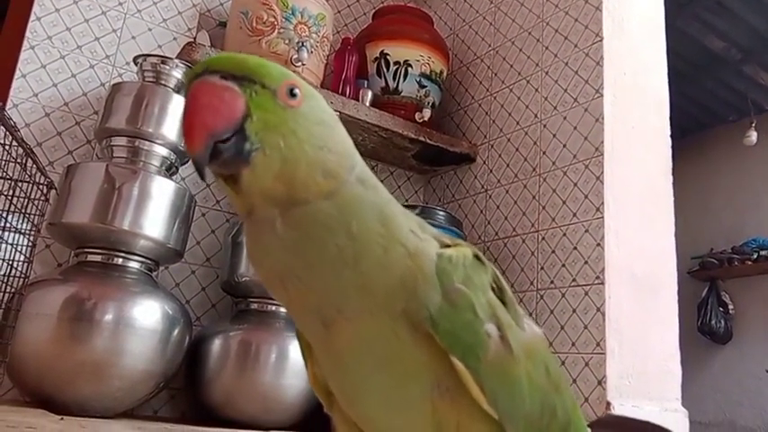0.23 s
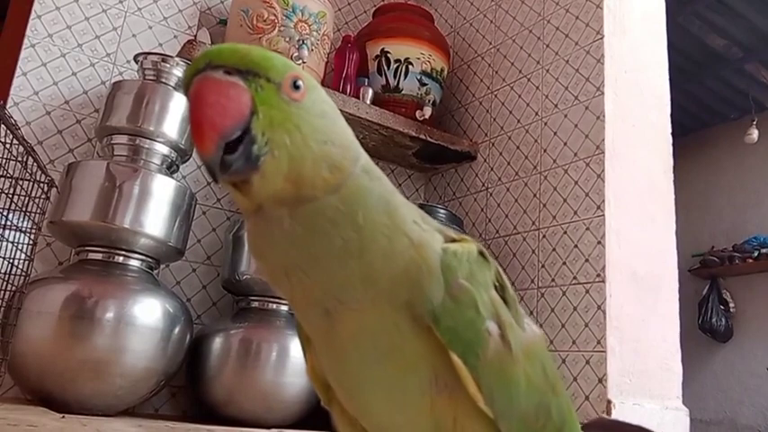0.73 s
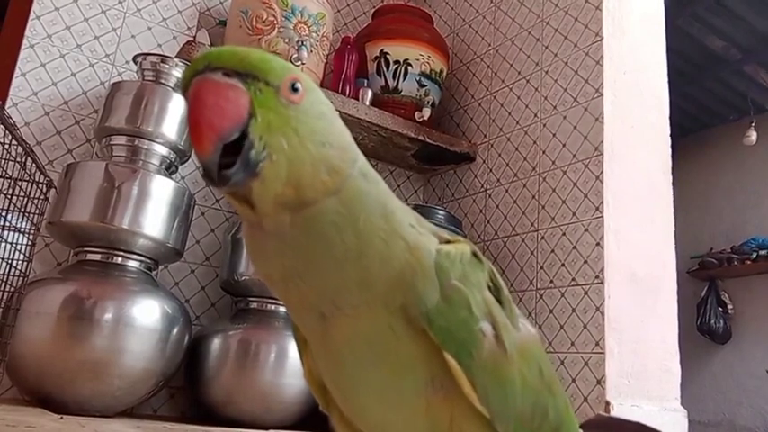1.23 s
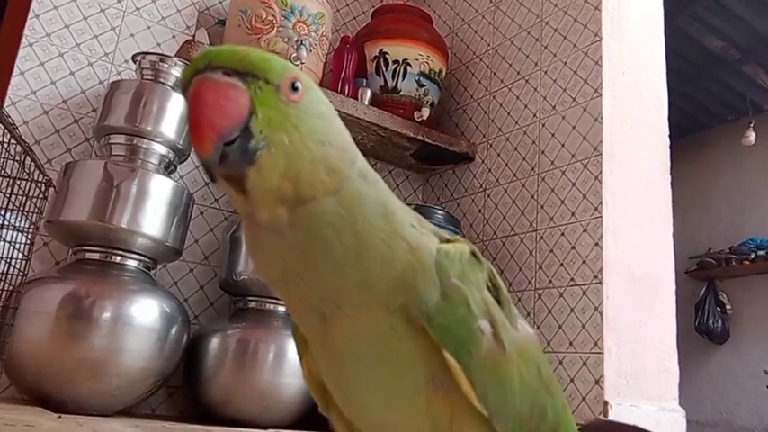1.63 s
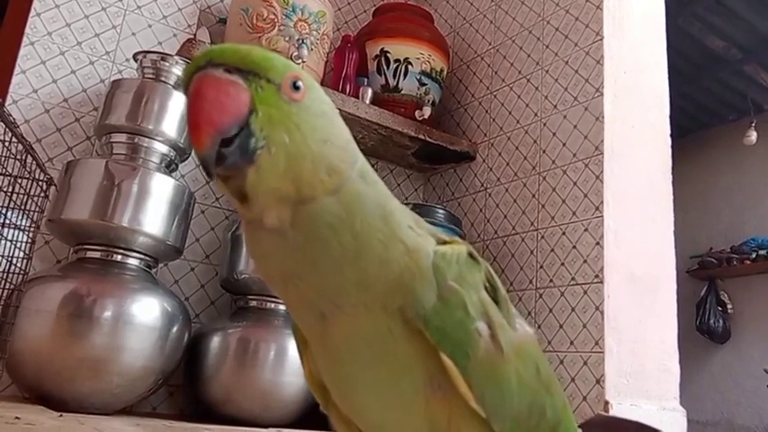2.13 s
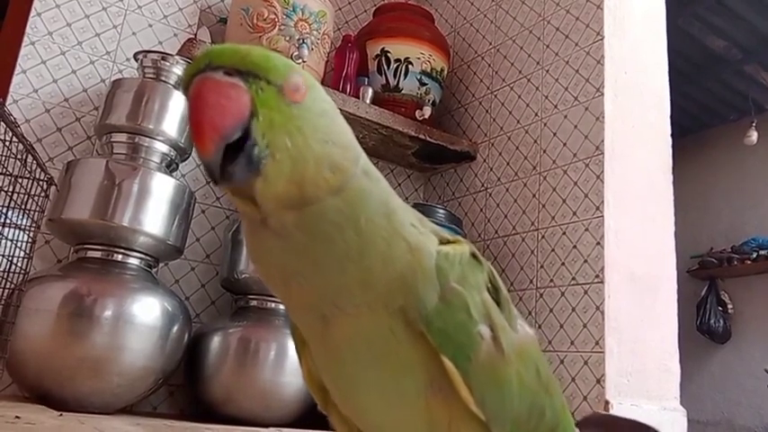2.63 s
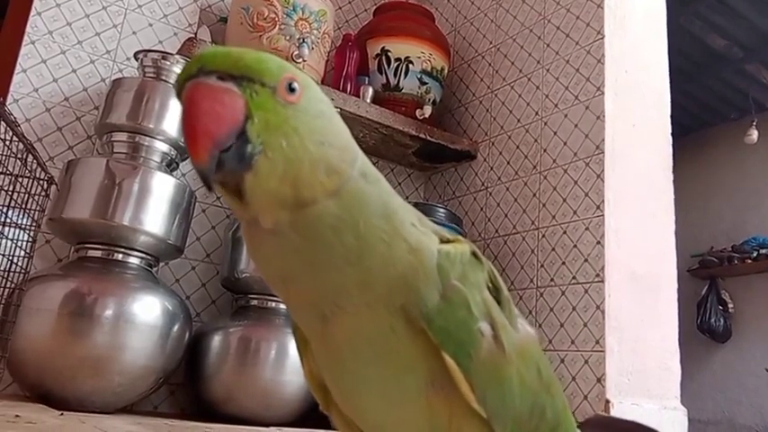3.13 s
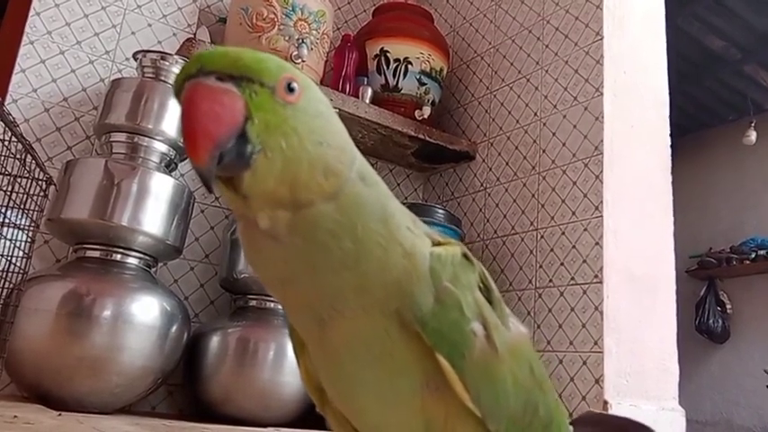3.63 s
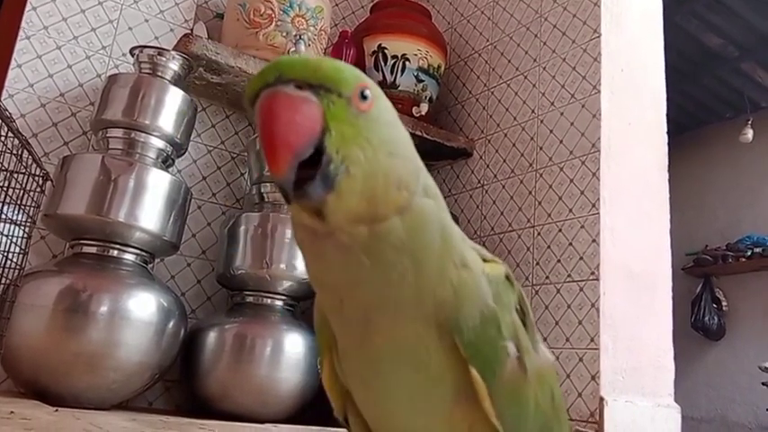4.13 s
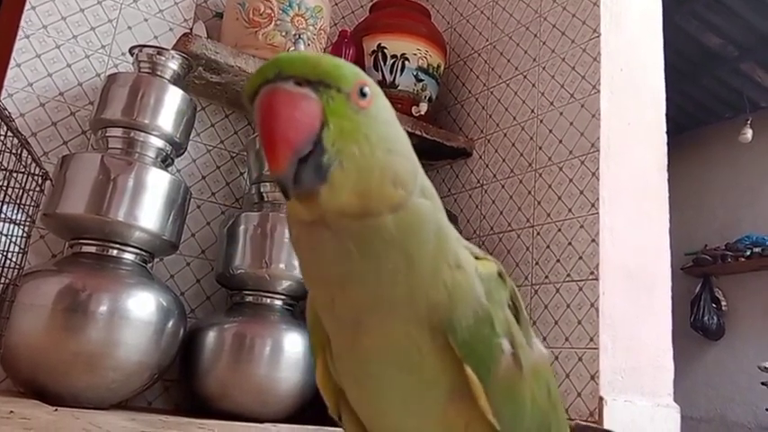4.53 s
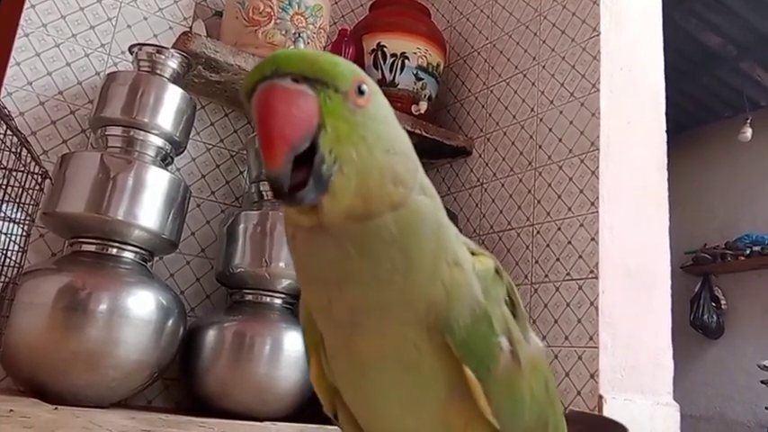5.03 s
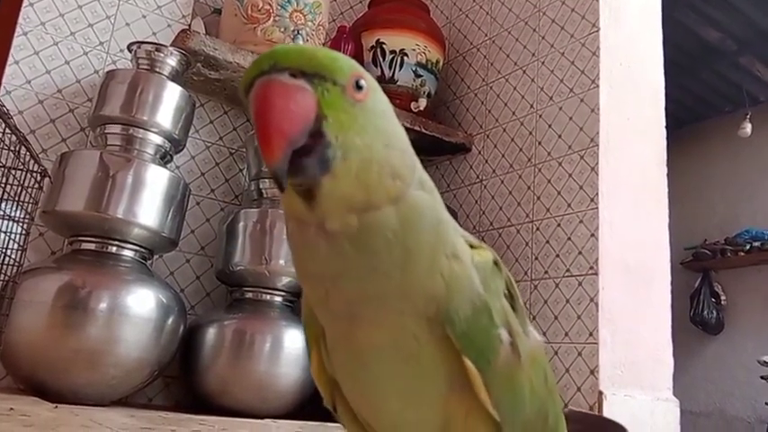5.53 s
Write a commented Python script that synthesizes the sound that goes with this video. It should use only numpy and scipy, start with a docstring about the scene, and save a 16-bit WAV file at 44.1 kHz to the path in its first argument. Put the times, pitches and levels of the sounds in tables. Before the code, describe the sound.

A parakeet chatters close to the microphone in a small tiled kitchen, each call ringing briefly off the hard walls. Two soft whistles sweep upward in the first half second. A yap comes at 0.7 seconds, then two high yelps that tumble down at 0.8 and 1.0. A fast, falling trill runs from 1.4 to 1.75, followed by a falling squeak at 1.9 and a rising one from 2.2 to 2.5. A cluck with a beak click lands at 2.8, and a rising whistle at 3.0. A nasal buzz, clucks and a drawn-out nasal note fill 3.3 to 3.8. After a faint beak tick, a croak and a short rattle come around 4.2 to 4.4. A whistle climbs to a loud peak near 4.8, followed by another upsweep, a raspy screech at 5.2, a dropping squeak at 5.5 and a final rising whistle. A faint low rumble comes and goes underneath.

```python
"""A parakeet chatters up close in a small tiled kitchen: soft whistles, squawks, yelps, one trill,
swooping squeaks, nasal buzzes, clucks and a short rattle, with two ticks of the beak.
Every call is one voice: the syrinx makes a stack of gliding harmonics, coloured by the windpipe,
the throat and the opening of the beak. The hard walls ring on after each call,
and a faint low rumble comes and goes over still room air."""
import sys
import numpy as np
from scipy import signal
from scipy.fft import rfft, irfft
from scipy.io import wavfile
from scipy.ndimage import uniform_filter1d

SR = 44100
rng = np.random.default_rng(int(sys.argv[2]) if len(sys.argv) > 2 else 0)


def log_audio(samples):
    """Write samples as a 16-bit WAV file to the path given in sys.argv[1]."""
    # one column per channel
    frames = np.atleast_2d(samples).T
    # limit to full scale, then quantise
    limited = np.clip(frames, -1, 1)
    pcm = np.round(limited * 32767).astype(np.int16)
    wavfile.write(sys.argv[1], SR, pcm)


N = 254898

CUTOFF_HZ, LOWEST_VOICE_HZ = 15900, 440
WINDPIPE_HZ, WINDPIPE_Q = 3293, 4.95
BEAK_SHUT_HZ, BEAK_WHISTLE_MAX_HZ, BEAK_Q = 1157, 3020, 2.85
SMEAR_S = 0.00072   # the top of the spectrum leaves the throat this much later than the bottom
# depth of the fast pitch wobble: on a steady note, and added in a fast glide
STEADY_WOBBLE, GLIDE_WOBBLE, FAST_GLIDE_OCT_PER_S = .0035, 0.079, 50
TRILL_START_S, TRILL_LENGTH_S = 1.396, .356

# throat colour when whistling, narrowed to a buzz, wide open and trilling: f/Hz, relative level/dB
WHISTLE_THROAT = [(600, 25), (1200, 20.5), (1900, 2), (2800, -9.5), (3400, 3), (4100, -21.5), (5000, 0.5),
                  (6000, 3.5), (7000, 4.5), (8200, -9.5), (10000, 20), (11500, 20), (13300, 2.5),
                  (15500, -3)]
BUZZ_THROAT = [(400, 13.5), (600, 0), (1000, 0), (1600, 0), (2400, 1), (3400, -1.5), (4600, 3.5),
               (5700, -5.5), (6900, 3), (7900, -6), (9800, 12.5), (11400, 22), (13300, -2.5), (15500, 13)]
OPEN_THROAT = [(400, 12), (600, 0.5), (1000, 0.5), (1600, 0), (2400, 4), (3400, 0.5), (4600, 5.5),
               (6000, 1.5), (7000, 7), (8200, 6.5), (10000, 18.5), (11500, 20.5), (13300, -10.5),
               (15500, 13)]
TRILL_THROAT = [(600, 3.5), (1000, -2), (1600, 1), (2400, -1), (3300, -4), (4300, -3), (5200, 1),
                (7000, 0.5), (8200, 2), (10000, 12), (11500, 20.5), (13300, 8), (15500, 20.5)]
# narrow dips in the top of every call, and the nasal colour of buzzes and clucks: f/Hz, Q, gain/dB
TREBLE_NOTCHES = [(12380, 6.7, -12), (8200, 17, -7.5)]
NASAL_PEAKS = [(3466, 12, 5), (4860, 11.5, 3.5), (5490, 9.9, -5.5), (8000, 4.5, -5), (11350, 15, 8)]
# spells of hoarseness: t/s, length/s, added wobble
RASPS = [(1.386, 0.24, 0.011), (3.445, 0.048, 0.073), (4.214, 0.021, 0.12), (5.187, 0.085, 0.17),
         (5.27, .07, 0.015), (5.326, 0.049, 0.1), (5.481, 0.063, 0.054)]

# a whistle's strength and purity follow its pitch: f/Hz, upsweep gain/dB, overtone slope/(dB/oct)
WHISTLE_RESPONSE = [(1160, 0, 5), (1307, -3, 7), (1670, -9.5, 8.5), (1835, -4, 8.5), (2117, 1, 5.5),
                    (2760, -4.5, -6.5)]
# soft whistles, levels before that gain: t/s, length/s, attack/s, scoop/Hz, held f/Hz, creep/(Hz/s),
# mid-sweep t/s, sweep time/s, top f/Hz, held level/dB, sweep level/dB
UPSWEEPS = [(0, .09, 0.00033, 2, 1340, 3, 0.054, 0.016, 2572, -32.5, -28.5),
            (0.235, 0.21, 0.06, 20, 1571, -5, 0.42, 0.011, 2976, -33.5, -28),
            (2.983, 0.22, 0.016, 177, 1145, 1054, 3.187, 0.011, 2864, -30, -32),
            (4.822, .148, 0.00044, 716, 1797, 4, 4.946, 0.014, 3340, -41, -26.5),
            (5.622, 0.16, 0.0089, 140, 1253, 306, 5.82, 0.022, 2770, -33.5, -31)]
# one long whistle climbing to a peak: t/s, f/Hz, level/dB
ARCHED_WHISTLE = [(4.518, 610, -44.5), (4.538, 584, -42), (4.578, 802, -40), (4.6, 1252, -33),
                  (4.624, 1492, -44), (4.674, 2220, -36.5), (4.71, 2940, -28), (4.744, 3340, -18.5),
                  (4.776, 3505, -17.5), (4.798, 3424, -20.5), (4.82, 2450, -34)]
# faint rough squeaks trailing two of the whistles: t/s, length/s, start f/Hz, end f/Hz, peak level/dB
TRAILS = [(0.092, 0.17, 3740, 2785, -48.5), (3.202, 0.16, 3850, 2610, -50)]

# gestures of the longer calls: t/s, f/Hz, level/dB, overtone slope/(dB/oct)
YAP = [(0.652, 478, -40.5, -2), (0.664, 589.5, -27, -2), (0.692, 1413, -22.5, -2), (0.698, 1169, -26.5, -2),
       (0.706, 819, -25, -2), (0.72, 617, -26, -2), (0.735, 602, -42, -2)]
FALLING_SQUEAK = [(1.877, 2015, -27.5, -2), (1.897, 1973, -21.5, -4), (1.919, 1622, -27, -0.5),
                  (1.931, 1777, -27.5, -0.5), (1.943, 1615, -21, -2), (1.999, 1511, -25.5, -5),
                  (2.023, 1167, -24, -5), (2.057, 1136, -26, -6), (2.076, 1110, -37, -2.5)]
RISING_SQUEAK = [(2.21, 496, -56, -1.5), (2.232, 767, -45, -8.5), (2.256, 748, -35, -5),
                 (2.288, 732.6, -33, -5), (2.35, 810, -27, -2.5), (2.376, 1220, -30, -3.5),
                 (2.402, 1376, -25.5, -4.5), (2.452, 1471, -24.5, -6.5), (2.5, 1482, -23, -5.5),
                 (2.522, 1348, -26.5, -3), (2.542, 1203, -28.5, -4)]
BUZZ = [(3.32, 523, -48.5, -1), (3.348, 482.6, -34.5, -0.34), (3.406, 494.7, -28, -0.37),
        (3.416, 512, -27.5, -1), (3.423, 526, -43, -1)]
DRAWL = [(3.478, 587, -30, 0.0035), (3.484, 597, -31.5, 0), (3.494, 540, -30.5, 0.0063),
         (3.546, 509, -42, 0.0026), (3.674, 619, -35, 0.0044), (3.776, 660.4, -34, 0), (3.8, 643, -34.5, 0),
         (3.822, 555, -35, 0), (3.834, 436, -46, 0.0038), (3.842, 430, -42, 0)]
CROAK = [(4.192, 530, -33, 1), (4.198, 505, -30, 1), (4.216, 504.5, -28, 1), (4.226, 513, -36, 1),
         (4.239, 503, -42, 1)]
SCREECH = [(5.172, 463, -36.5, -1.5), (5.19, 710, -27.5, -2.2), (5.202, 762, -28, -1.1),
           (5.238, 797.5, -25.5, -1.2), (5.266, 644, -25.5, -0.025), (5.314, 612, -29, -0.53),
           (5.338, 854.0, -24, -1.1), (5.352, 743, -25.5, -2.7), (5.376, 708.7, -40, -1.5)]
SHORT_SQUEAK = [(5.467, 2945, -33.5, -7), (5.485, 2806, -24.5, -1), (5.495, 2015, -31, -3),
                (5.503, 1292, -25.5, -8), (5.511, 1024, -28, -5), (5.521, 1162, -50, -9)]
# how the beak plays them: gesture, wide-open resonance f/Hz, closing/(oct/dB below the peak)
SQUAWK_CALLS = [(YAP, 4000, .005), (SCREECH, 3730, 0.011)]
SQUEAK_CALLS = [(FALLING_SQUEAK, 4130, 0.049), (RISING_SQUEAK, 4840, 0.11), (SHORT_SQUEAK, 4340, .02)]
NASAL_CALLS = [(BUZZ, 3380, 0.13), (DRAWL, 2250, 0.14), (CROAK, 1860, .01)]

# gesture of a yelp: t/s from its start, f/Hz, relative level/dB, overtone slope/(dB/oct)
YELP_SHAPE = [(0, 2686, -13, -5), (.01, 2488, -10, -1), (.04, 2432, -4.5, 0), (.069, 2710, -0.5, 1.5),
              (.078, 1678, 0.5, -5.5), (0.092, 1526, 0, -8), (.103, 1210, 3, 0), (.114, 700.5, -2, -4),
              (0.131, 588, -15.5, -3)]
# yelp cues: t/s, time stretch, pitch factor, level/dB
YELPS = [(0.806, 1.013, .99, -25), (1.025, 0.97, 1.01, -23.5)]
# short rising clucks, some alone, some opening or closing a longer call:
# t/s, length/s, start f/Hz, end f/Hz, level/dB, beak f/Hz, overtone slope/(dB/oct)
CLUCKS = [(1.379, .012, 1390, 1540, -49, 1490, -8), (2.8408, 0.0074, 740, 1263, -23.5, 3330, 0),
          (3.451, .011, 628, 1265, -23.5, 3240, -2), (3.467, .012, 567, 970, -25, 3020, -3),
          (4.219, 0.0127, 620, 917, -31.5, 2550, -2.5)]
# snaps of the beak: t/s, ring level/dB, f/Hz
BEAK_TICKS = [(2.8411, -28.5, 3050), (4.066, -43.5, 1410)]

# colour of the room air and of the rumble's rush: f/Hz, relative level/dB
AIR_COLOUR = [(30, -12.5), (100, -5), (250, 0.5), (500, -7), (1500, -2), (3000, -18.5), (8000, -24.5),
              (16000, -29.5)]
RUSH_COLOUR = [(60, -37.5), (100, -17), (140, -1), (230, 1), (320, -5.5), (450, -15), (700, -12),
               (1500, -41)]
# swells of the rumble's rush and of its drone: t/s, hold/s, level/dB
RUSH_SWELLS = [(2.41, .15, -54.5), (3.04, 0.029, -71.5), (3.33, 0.082, -75.5), (3.75, .4, -81.5),
               (5.71, .1, -49.5)]
DRONE_SWELLS = [(2.65, .3, -67), (3.22, .2, -71.5)]
# reflections off the nearest surfaces: delay/s, level/dB
NEAR_ECHOES = [(.0013, -21), (.0031, -23.5), (.0057, -23.5)]
# reverb of the hard walls: f/Hz, level/dB, T60/s
WALL_REVERB = [(296, -4.5, 0.62), (660, -16.5, 0.34), (1250, -11, 0.38), (2400, -9.5, 0.42),
               (4070, -19.5, 0.59), (6100, -0.5, 0.31), (7400, -5, 0.27), (10300, -36.5, 0.2),
               (15000, -42.5, .25)]


def from_db(db):
    """Decibels to gain."""
    return 10 ** (np.asarray(db) / 20)


def rms_one(x):
    """Scale to unit power."""
    return x / np.sqrt(np.mean(x ** 2) + 1e-20)


def s_curve(x):
    """A smooth step from 0 to 1."""
    return (1 + np.tanh(x / 2)) / 2


def at_time(rows, t):
    """Every column of a gesture at the times t."""
    times, *columns = np.transpose(rows)
    return [np.interp(t, times, column) for column in columns]


def at_hz(points, hz, column=1):
    """One column of a spectrum, read on a log-frequency axis."""
    points = np.array(points)
    return np.interp(np.log(np.maximum(hz, 1)), np.log(points[:, 0]), points[:, column])


def coloured_noise(colour):
    """Steady noise of a given colour, rms 1."""
    gain = from_db(at_hz(colour, np.fft.rfftfreq(N, 1 / SR)))
    return rms_one(irfft(rfft(rng.standard_normal(N)) * gain, N))


def band_noise(low_hz, high_hz, samples=N):
    """Noise within one band, rms 1."""
    band = signal.butter(2, [low_hz, high_hz], "band", fs=SR, output="sos")
    return rms_one(signal.sosfilt(band, rng.standard_normal(samples)))


def resonate(x, peaks):
    """Lift or cut narrow bands, one after the other."""
    for hz, q, db in peaks:
        x = x + (from_db(db) - 1) * signal.lfilter(*signal.iirpeak(hz, q, fs=SR), x + 1e-18)
    return x


def moments(length):
    """Closely spaced points from 0 to length."""
    return np.linspace(0, length, 240)


def as_call(*columns):
    """Rows that steer the voice: t/s, f/Hz, level/dB, beak f/Hz, overtone slope/(dB/oct)."""
    return np.column_stack(np.broadcast_arrays(*columns))


def samples_of(call):
    """The samples that a call spans."""
    return np.arange(max(int(call[0][0] * SR), 0), min(int(call[-1][0] * SR), N))


def hoarseness(t, pitch):
    """The voice is unsteady while its pitch jumps, and in spells of rasping."""
    oct_per_s = uniform_filter1d(np.gradient(np.log2(pitch)) * SR, size=300)
    glide = (oct_per_s / FAST_GLIDE_OCT_PER_S) ** 2
    spells = sum(depth * np.sqrt(np.clip(1 - (2 * (t - start) / length - 1) ** 2, 0, 1))
                 for start, length, depth in RASPS)
    return STEADY_WOBBLE + GLIDE_WOBBLE * glide / (1 + glide) + spells


def voice(call, wobble, throat, windpipe_db, bend=0, fade_s=0.0017, rasp=1.4, grit=0.56, release=0.042):
    """The syrinx's harmonics slide through the resonances of windpipe, throat and beak."""
    span = samples_of(call)
    t = span / SR
    pitch, level_db, beak_hz, slope = at_time(call, t)
    jitter, shimmer = wobble[:, span] * hoarseness(t, pitch)
    pitch = pitch * np.exp(jitter + grit * shimmer + bend)
    phase = 2 * np.pi * np.cumsum(pitch) / SR
    tone, power = 0, 1e-20
    for k in range(1, int(CUTOFF_HZ / pitch.min()) + 1):
        hz = k * pitch
        beak = 1 / (1 - (hz / beak_hz) ** 2 + 1j * hz / beak_hz / BEAK_Q)
        detuning = hz / WINDPIPE_HZ - WINDPIPE_HZ / hz
        windpipe = 1 + (from_db(windpipe_db) - 1) / (1 + 1j * WINDPIPE_Q * detuning)
        colour = from_db(at_hz(throat, hz) + slope * np.log2(k))
        partial = beak * windpipe * colour * (hz < SR / 2)
        lag = np.pi * SMEAR_S * hz ** 2 / CUTOFF_HZ
        tone = tone + (partial * np.exp(1j * (k * phase - lag))).real
        power = power + abs(partial) ** 2 / 2
    release_s = fade_s + release * min(t[-1] - t[0], .15)
    fade = np.clip(np.minimum((t - t[0]) / fade_s, (t[-1] - t) / release_s), 0, 1)
    roughness = 1 + rasp * shimmer   # a hoarse voice varies in strength from cycle to cycle
    out = np.zeros(N)
    out[span] = tone / np.sqrt(power) * from_db(level_db) * fade * roughness
    return out


def room_air(level_db=-78.5):
    """A steady bed of still air under everything."""
    return from_db(level_db) * coloured_noise(AIR_COLOUR)


def whistled(t, pitch, db):
    """In a whistle the beak is tuned to the pitch, as far as it can reach."""
    beak_hz = np.clip(pitch, BEAK_SHUT_HZ, BEAK_WHISTLE_MAX_HZ)
    return as_call(t, pitch, db, beak_hz, at_hz(WHISTLE_RESPONSE, pitch, column=2))


def upsweep(start, length, attack_s, scoop_hz, held_hz, creep, sweep_at, sweep_s, top_hz,
            held_db, sweep_db, scoop_s=.014, attack_db=17):
    """A whistle's gesture: scoop down to a held note, then sweep up."""
    age = moments(length)
    rise = s_curve((start + age - sweep_at) / sweep_s)
    scoop = scoop_hz * np.exp(-age / scoop_s)
    pitch = held_hz + scoop + creep * age * (1 - rise) + (top_hz - held_hz) * rise
    db = sweep_db + (held_db - sweep_db) * (1 - rise) ** 4 - attack_db * np.exp(-age / attack_s)
    return whistled(start + age, pitch, db + at_hz(WHISTLE_RESPONSE, pitch))


def whistles(wobble, flutter_hz=400, flutter_depth=0.097, flutter_bend=0.014):
    """Clean whistles; where they are soft, a slower vibration of the membranes adds side tones."""
    drift = 1 + 0.036 * band_noise(5.4, 30)
    flutter = np.sin(2 * np.pi * flutter_hz * np.cumsum(drift) / SR)
    calls = [upsweep(*row) for row in UPSWEEPS] + [whistled(*np.transpose(ARCHED_WHISTLE))]
    out = np.zeros(N)
    for call in calls:
        level_db = at_time(call, np.arange(N) / SR)[1]
        sway = flutter * np.clip((-31.5 - level_db) / 8, 0, 1)
        bend = -flutter_bend * sway[samples_of(call)]
        tone = voice(call, 0.58 * wobble, WHISTLE_THROAT, windpipe_db=-1, bend=bend, fade_s=0.00094)
        out += tone * (1 + flutter_depth * sway)
    return out


def trails(roughness=0.0624, swell_db=9, peak_at=0.6, peak_width=0.33, slope=-26):
    """Barely voiced squeaks: the pitch wavers widely and sags ever faster, the level swells late."""
    wobble = roughness / STEADY_WOBBLE * np.array([band_noise(79, 500), band_noise(140, 540)])
    progress = moments(0.8)   # the voice stops short of the full length and the end pitch
    swell = np.exp(-((progress - peak_at) / peak_width) ** 2)
    out = np.zeros(N)
    for start, length, high_hz, low_hz, peak_db in TRAILS:
        pitch = high_hz + (low_hz - high_hz) * progress ** 2
        call = as_call(start + length * progress, pitch, peak_db - swell_db * (1 - swell), pitch, slope)
        out += voice(call, wobble, WHISTLE_THROAT, windpipe_db=-1, fade_s=0.0053)
    return out


def with_beak(gesture, open_hz, closing):
    """The beak is widest at the loudest moment and closes as the call softens."""
    t, pitch, db, slope = np.transpose(gesture)
    beak_hz = np.maximum(open_hz * 2 ** (closing * (db - db.max())), BEAK_SHUT_HZ)
    return as_call(t, pitch, db, beak_hz, slope)


def squawks(wobble):
    """A yap and a screech, pushed through a narrowed throat and an open beak."""
    return sum(voice(with_beak(*row), wobble, BUZZ_THROAT, windpipe_db=-6.5, fade_s=0.0012)
               for row in SQUAWK_CALLS)


def yelps(wobble, beak_hz=3850):
    """With the beak wide open, a high note holds, breaks and tumbles down."""
    age, pitch, db, slope = np.transpose(YELP_SHAPE)
    out = np.zeros(N)
    for start, stretch, pitch_factor, level_db in YELPS:
        call = as_call(start + stretch * age, pitch_factor * pitch, level_db + db, beak_hz, slope)
        out += voice(call, wobble, OPEN_THROAT, windpipe_db=1.5, fade_s=0.0008)
    return out


def clucks(rows, wobble):
    """Each cluck is a few cycles of voice, rising in pitch."""
    out = np.zeros(N)
    for start, length, low_hz, high_hz, db, beak_hz, slope in rows:
        call = [(start, low_hz, db, beak_hz, slope), (start + length, high_hz, db, beak_hz, slope)]
        out += voice(call, wobble, BUZZ_THROAT, windpipe_db=6, fade_s=0.0034)
    return out


def trill_gesture(high_hz=1465, low_hz=947, fall_at_s=1.548, fall_s=0.052, level_db=-24, attack_db=9,
                  attack_s=.045, end_s=0.0072, end_sag=.2, end_db=14, beak_hz=3100, slope=-2.8):
    """The trill swells, slides down to a lower note and droops at its end."""
    age = moments(TRILL_LENGTH_S)
    t = TRILL_START_S + age
    ending = np.exp((age - TRILL_LENGTH_S) / end_s)
    pitch = high_hz + (low_hz - high_hz) * s_curve((t - fall_at_s) / fall_s)
    db = level_db - attack_db * np.exp(-age / attack_s) - end_db * ending
    return as_call(t, pitch * (1 - end_sag * ending), db, beak_hz, slope)


def trill(wobble, count=15, first_dips_per_s=51.9, stall_s=.425, first_depth=0.34, last_depth=0.21,
          duck_db=2.6, gap_db=44, gaps_s=0.062):
    """The pitch bounces in arches, ever slower and shallower, then holds; early dips cut the voice."""
    call = trill_gesture()
    span = samples_of(call)
    age = np.maximum(span / SR - TRILL_START_S, 0)
    dips_done = np.cumsum(first_dips_per_s * (1 - (age / stall_s) ** 4)) / SR
    dip = (1 - abs(np.sin(np.pi * np.minimum(dips_done, count + .5)))) ** 1.1
    depth = first_depth + (last_depth - first_depth) * (age / TRILL_LENGTH_S) ** 1.1
    drop_db = duck_db + gap_db * np.exp(-(age / gaps_s) ** 2)
    out = voice(call, wobble, TRILL_THROAT, windpipe_db=9.5, bend=-depth * dip)
    out[span] *= from_db(-dip * drop_db)
    return out


def squeaks(wobble):
    """Swooping calls through a wide-open throat, brighter as the beak opens."""
    return sum(voice(with_beak(*row), wobble, OPEN_THROAT, windpipe_db=1.5, fade_s=0.0008)
               for row in SQUEAK_CALLS)


def swells(rows, floor_db, attack_db_per_s, fade_db_per_s):
    """A gain that rises, holds and sinks back to its floor."""
    t = np.arange(N) / SR
    gain = from_db(floor_db)
    for peak_at, hold, db in rows:
        attack_db = attack_db_per_s * np.maximum(peak_at - t, 0)
        fade_db = fade_db_per_s * np.maximum(t - peak_at - hold, 0)
        gain = gain + from_db(db - attack_db - fade_db)
    return gain


def rumble(drone_hz=80.5):
    """A distant low rush and a narrow-band drone, each swelling in its own time."""
    rush_gain = swells(RUSH_SWELLS, floor_db=-88, attack_db_per_s=540, fade_db_per_s=82)
    drone_gain = swells(DRONE_SWELLS, floor_db=-93, attack_db_per_s=127, fade_db_per_s=250)
    return rush_gain * coloured_noise(RUSH_COLOUR) + drone_gain * band_noise(drone_hz - 8, drone_hz + 8)


def beak_ticks(ring_s=0.0029, snap_s=0.002, snap_db=-5):
    """The beak snaps and its hollow rings briefly."""
    out, t = np.zeros(N), np.arange(SR // 20) / SR
    for start, db, hz in BEAK_TICKS:
        ring = np.sin(2 * np.pi * hz * t) * np.exp(-t / ring_s)
        snap = np.diff(rng.standard_normal(len(t) + 1)) * np.exp(-t / snap_s)
        out[int(start * SR) + np.arange(len(t))] += from_db(db) * (ring + from_db(snap_db) * snap)
    return out


def buzzes(wobble):
    """A buzz, a drawl and a croak: low notes, thick with overtones, through a narrowed throat."""
    return sum(voice(with_beak(*row), wobble, BUZZ_THROAT, windpipe_db=2.5, fade_s=0.0027)
               for row in NASAL_CALLS)


def rattle(wobble, start_s=4.3064, count=7, gap_s=.0171, quicken_s=.00018, first_s=0.0099, last_s=0.0163,
           low_hz=505, first_hz=920, last_hz=770, level_db=-23.5, fade_db=19, open_hz=3700, slope=-1.2):
    """A quickening run of clucks, each longer, lower, softer and duller as the beak closes."""
    k = np.arange(count)
    progress = k / (count - 1)
    starts = start_s + gap_s * k - quicken_s * k ** 2
    lengths = first_s + (last_s - first_s) * progress
    high_hz = first_hz + (last_hz - first_hz) * progress
    db = level_db - fade_db * progress ** 2.9
    beak_hz = BEAK_SHUT_HZ + (open_hz - BEAK_SHUT_HZ) * np.exp(-(progress / 0.44) ** 2)
    return clucks(np.broadcast(starts, lengths, low_hz, high_hz, db, beak_hz, slope), wobble)


def near_echoes(x):
    """Close reflections make each harmonic swell and fade as it glides."""
    t = np.arange(N) / SR
    return sum(from_db(db) * np.interp(t - delay, t, x, left=0) for delay, db in NEAR_ECHOES)


def kitchen_reverb(x, predelay_s=0.0024, build_s=0.0009):
    """Dense echoes from tiles and pots, dying away at their own rate in each band."""
    t = np.arange(SR * 3 // 4) / SR
    onset = np.clip((t - predelay_s) / build_s, 0, 1)
    edges_hz = np.geomspace(200, 17000, 15)
    response = 0
    for low, high in zip(edges_hz, edges_hz[1:]):
        hz = np.sqrt(low * high)
        decay = from_db(-60 * t / at_hz(WALL_REVERB, hz, column=2))
        tail = rms_one(band_noise(low, high, len(t)) * onset * decay)
        unity_gain = np.sqrt(2 * (high - low) / SR / len(t))
        response = response + tail * unity_gain * from_db(at_hz(WALL_REVERB, hz))
    return signal.fftconvolve(x, response)[:N]


def scene():
    """The bird, its room and the background, the same in both channels."""
    wobble = np.array([band_noise(70, 190), band_noise(140, 600)])   # jitter and shimmer of the syrinx
    nasal = resonate(clucks(CLUCKS, wobble) + buzzes(wobble) + rattle(wobble), NASAL_PEAKS)
    calls = whistles(wobble) + trails() + squawks(wobble) + yelps(wobble) + trill(wobble)
    calls += squeaks(wobble) + nasal
    bird = resonate(calls, TREBLE_NOTCHES) + beak_ticks()
    # a high-pass keeps the rough calls free of low thumps
    bird = signal.sosfilt(signal.butter(4, LOWEST_VOICE_HZ, "high", fs=SR, output="sos"), bird)
    mix = bird + near_echoes(bird) + kitchen_reverb(bird) + rumble() + room_air()
    return np.tile(mix, (2, 1))


def record(dry):
    """A steep low-pass takes off the very top."""
    return signal.sosfilt(signal.ellip(10, .1, 80, CUTOFF_HZ, fs=SR, output="sos"), dry)


dry = scene()
out = record(dry)
log_audio(out)
```